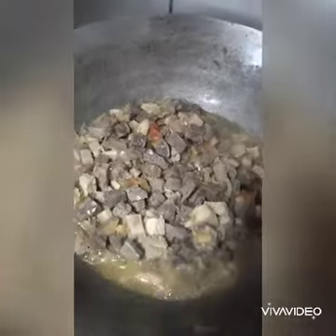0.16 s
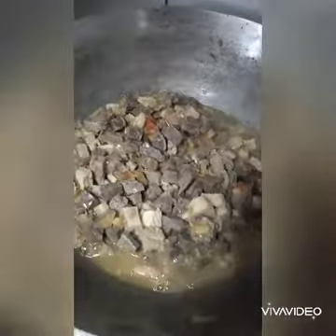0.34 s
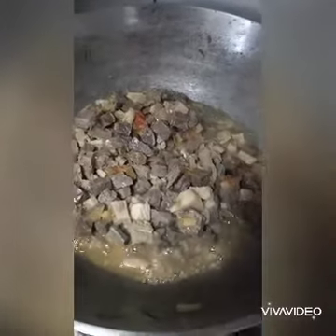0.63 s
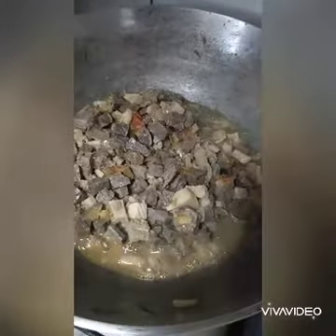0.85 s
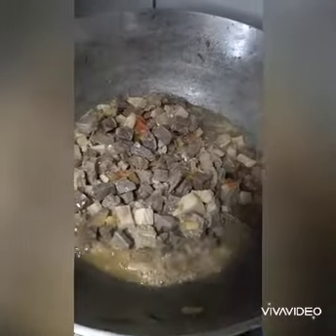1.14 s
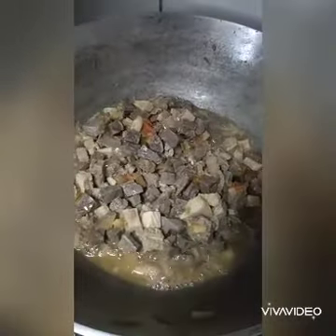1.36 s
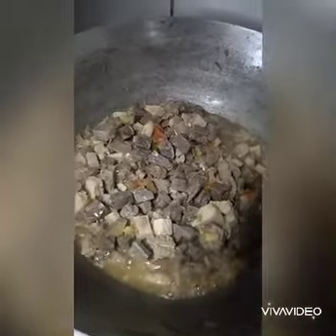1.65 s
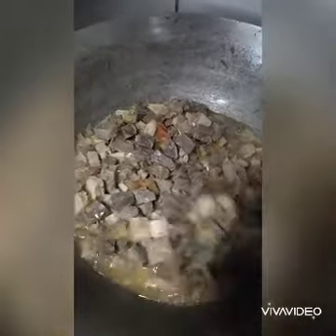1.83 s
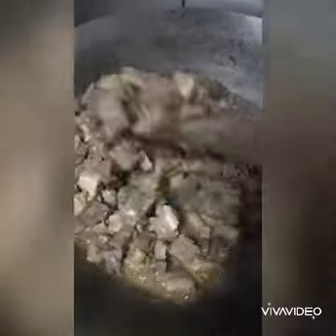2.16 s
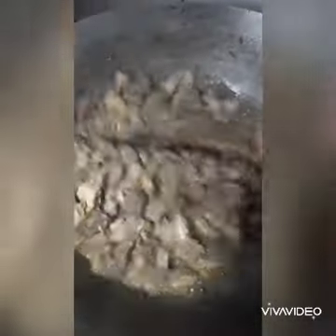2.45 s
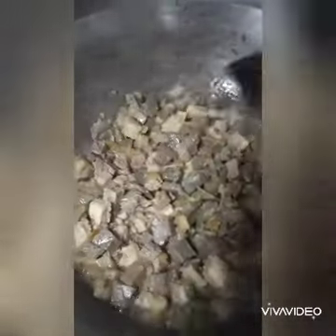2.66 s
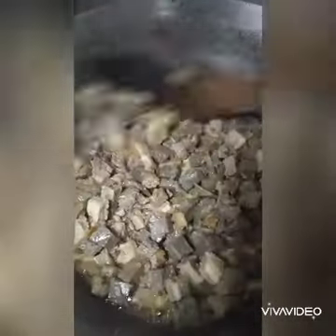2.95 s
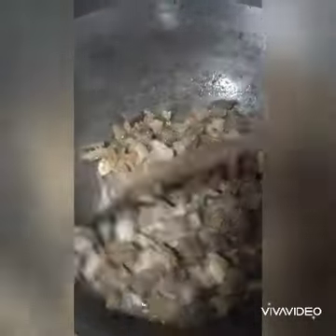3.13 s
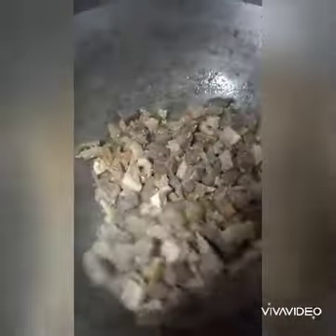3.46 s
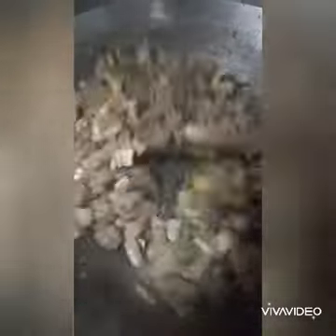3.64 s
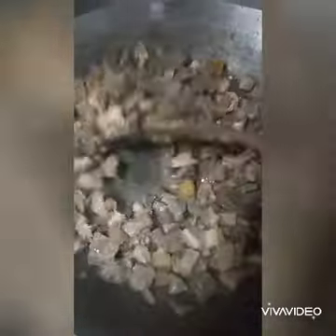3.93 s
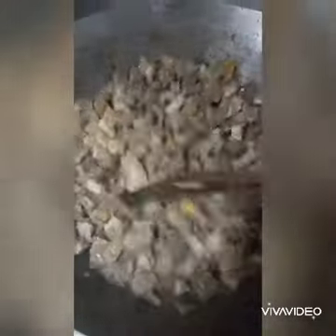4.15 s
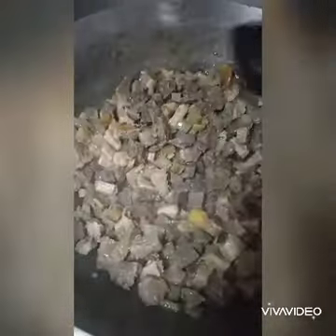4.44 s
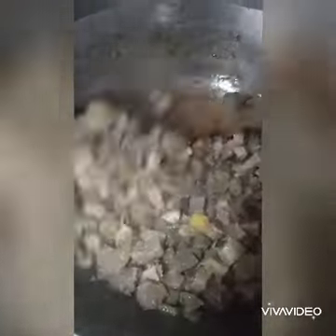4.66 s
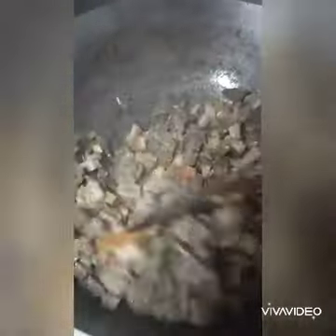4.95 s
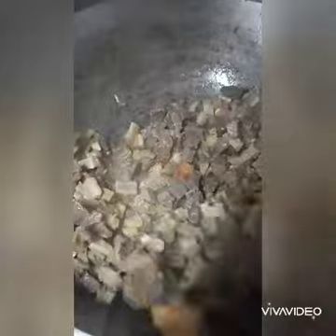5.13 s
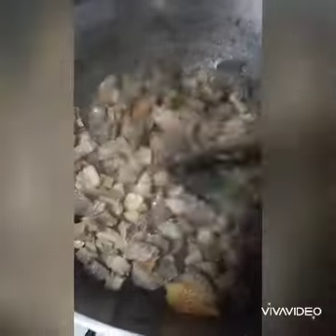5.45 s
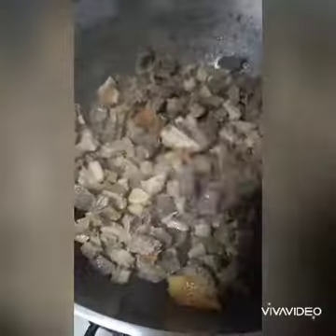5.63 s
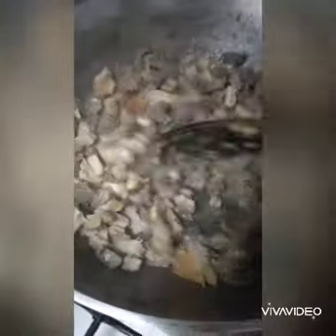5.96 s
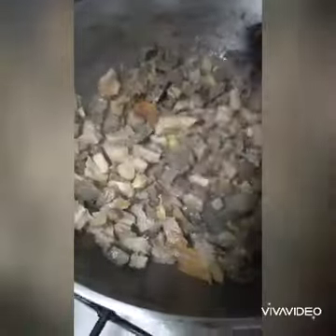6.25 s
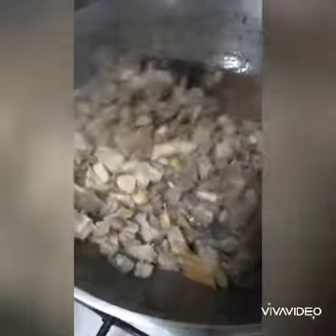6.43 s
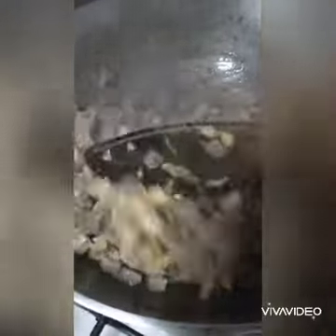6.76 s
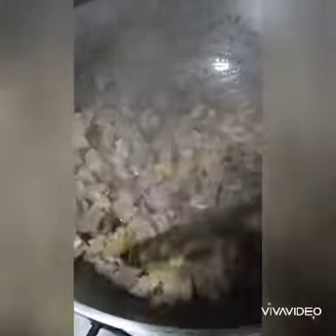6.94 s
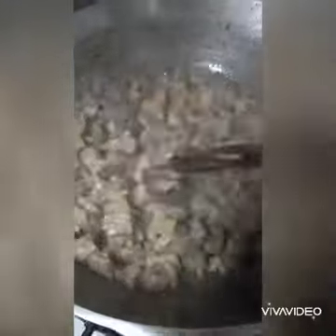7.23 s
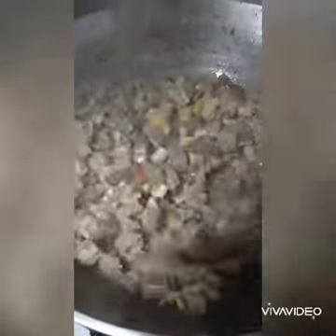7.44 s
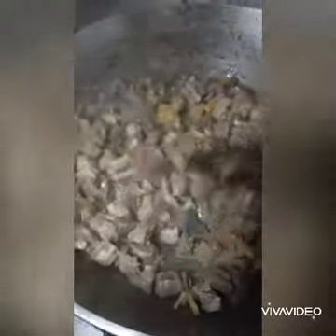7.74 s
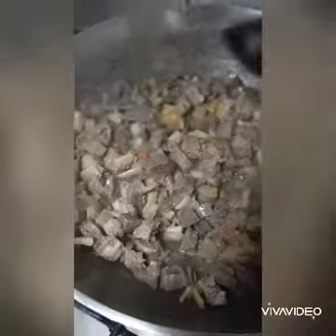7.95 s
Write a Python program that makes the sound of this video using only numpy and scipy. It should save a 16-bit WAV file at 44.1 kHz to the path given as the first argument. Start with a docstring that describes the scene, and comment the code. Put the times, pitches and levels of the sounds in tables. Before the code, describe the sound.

A close stereo phone pickup of a kitchen stove, leaning left: chopped meat fries in a steel wok with a steady, fine, crackling sizzle throughout. At 0 s a bowl is set down in a rapid hollow clatter lasting about a tenth of a second. Until about 1.8 s there is mainly sizzle, low sauce bubbling and soft bumps of the wok. From 2 s a spatula stirs in gritty, rushing scrapes with snapping bits, busiest to about 4.6 s, with dull ringing knocks on the wall near 2.7, 3.5 and 4.4 s and low thumps as the wok rocks. Bubbling fades after 3 s, returning briefly around 3.6 s. Separate strokes follow near 5.3 and 5.7 s, a knock at 6.1 s, a crisp crackly scrape at 7.0 s, softer strokes, then a firm metallic knock with a low thud at 7.8 s. Sizzling continues to the end at about 8 s.

```python
"""A kitchen stove: chopped meat simmers in a steel wok, close under a phone with two microphone ports.
Fat and sauce are two-port noise with short faint pips, and low thuds for bubbles; a spatula stirs with
gritty rushes of noise and snapping chips, and its shoves rock the wok so that resonances of stand
and hollow sound. Decaying modes with a dull crack make the knocks on the wall and, at the start,
a bowl that clatters down."""
import sys
import numpy as np
from scipy import signal
from scipy.fft import rfft, irfft, next_fast_len
from scipy.io import wavfile
from scipy.ndimage import uniform_filter1d

SR = 44100
rng = np.random.default_rng(int(sys.argv[2]) if len(sys.argv) > 2 else 0)


def store_wav(level_fs):
    """Save 16-bit WAV to argv[1]."""
    pcm = np.round(np.clip(np.atleast_2d(level_fs), -1, 1) * 32767)
    wavfile.write(sys.argv[1], SR, pcm.T.astype(np.int16))


N = 356769


def sizzle():
    """Countless steam bubbles burst in the fat, too dense to hear singly; the sauce bubbles lower and boils away."""
    # sizzling fat: (time [s], level [dB])
    fat_level = [(0.0, -48.5), (0.9, -48.5), (1.7, -48), (2.14, -48), (3.2, -48.5), (3.6, -47), (4.12, -48),
                 (4.73, -49), (5.18, -48.5), (6.76, -48.5), (8.09, -48.5)]
    # its colour at each port: (frequency [Hz], left [relative dB], right [relative dB])
    fat_colour = [(343.14, -6, -67), (520.1, -28.5, -26.5), (718.96, -35.5, -6), (815.62, -61.5, -23),
                  (1322.9, -13.5, -9), (2151.1, -7.5, -6), (2912.6, -17.5, -18.5), (5109.4, -16, -24.5),
                  (5760, -10.5, -11.5), (8624.1, -6, -11), (10166, -21, -26.5), (11548, -17, -22),
                  (13155, -23, -30), (14516, -30.5, -28.5)]
    # bubbling sauce: (time [s], level [dB])
    sauce_level = [(0.0, -49.5), (0.3, -54.5), (1.3, -55.5), (2.48, -53), (3.15, -60), (3.63, -55),
                   (4.19, -62.5), (4.64, -60.5), (5.95, -64), (6.4, -60.5), (7.21, -64), (8.09, -64.5)]
    # its colour at each port: (frequency [Hz], left [relative dB], right [relative dB])
    sauce_colour = [(498.5, -33, -57.5), (620.8, -26, 2), (746.5, -6, 7), (953.16, -1, -8),
                    (1003.8, 10.5, 9.5), (1275.8, -7.5, -4), (1541, -3, 7.5), (2485, -52, -59.5)]
    # low resonances of the boil: (frequency [Hz], width [Hz], level [relative dB])
    boil_modes = [(153.49, 64.7, -0.5), (237.36, 121.2, -2.5), (333.6, 62.57, -1)]
    fat = hiss(fat_colour, peaky=1, patchy_db=1.4, flicker_db=.35)
    sauce = hiss(sauce_colour, peaky=1, patchy_db=2.3, flicker_db=0.6954)
    thuds = rung(boil_modes, jolts(per_s=40., spread_db=2.894, wash=0.8937))  # large bubbles
    boil = gain_of(-11.5) * thuds * gain_of([[2.5], [-3.5]])
    fizz = fat + faint_pips()
    return gain_of(follow(fat_level)[0]) * fizz + gain_of(follow(sauce_level)[0]) * (sauce + boil)


def faint_pips():
    """Short faint tones, gliding up as they die, scattered over the fizz."""
    s, db, hz, pan_db = scattered(count=3000, hz=(896.45, 7931), spread_db=3.5)
    return pips(s, db - 16, hz, cycles=6.993, glide=0.14762, pan_db=pan_db)


def stir():
    """Steel drags over steel and wet food slumps: a patchy, gritty rush that swells and fades with each stroke."""
    # strokes of the spatula: (loudest moment [s], level [dB], time to fade by about 10 dB [s], sign ignored)
    strokes = [(.06, -55.5, 0.1533), (.59, -61.5, 0.4421), (1.62, -58, 0.2951), (1.98, -46, 0.192),
               (2.15, -52, 0.0259), (2.32, -47, 0.1985), (2.70, -52.5, 0.3384), (3.06, -53, 0.1957),
               (3.22, -53, -0.1313), (3.46, -50, 0.1593), (3.61, -49, 0.1235), (3.73, -51, 0.1874),
               (4.074, -52, 0.132), (4.412, -54.5, 0.2256), (4.472, -52, -0.0025), (4.535, -50.5, -0.033),
               (5.29, -49.5, 0.1709), (5.735, -50.5, 0.063), (6.155, -58, 0.2723), (7.03, -48.5, 0.0594),
               (7.24, -53, -0.0435), (7.29, -55, 0.0336), (7.47, -53.5, -0.1744), (7.87, -58, 0.205)]
    # colour of the rush at each port: (frequency [Hz], left [relative dB], right [relative dB])
    rush_colour = [(471.6, -18.5, -12.5), (758, -29, -1), (1015.7, -9, 1), (1712.3, 1, 1), (2263.7, 4, -2),
                   (3090.6, -1.5, 0), (3955.3, -23.5, -15), (5043, -7, -9.5), (6738.5, -5, -9.5),
                   (7872.5, 1, 0.5), (9410.5, -22.5, -20)]
    rise_share, blunt_top = 0.3594, 0.3235  # rise time as a share of the fade; rounding of each peak
    grit_per_s, grit_s, grit_share = 300., .003, .3
    t = coarse_time()
    strokes_db = []
    for peak_s, db, fade in strokes:
        fade_s = abs(fade)
        away = np.maximum((t - peak_s) / fade_s, (peak_s - t) / (rise_share * fade_s))
        strokes_db.append(db - 10 * (np.hypot(away, blunt_top) - blunt_top))
    settling_db = -60  # food settling between strokes
    level = np.interp(np.arange(N) / SR, t, summed(settling_db, strokes_db))
    chips = snaps(level)
    bumps = abs(jolts(grit_per_s, spread_db=2., wash=0))
    catches = signal.lfilter([1], [1, -np.exp(-1 / (grit_s * SR))], bumps)
    gritty = evened(1 - grit_share + grit_share * evened(catches))
    return chips + level * gritty * hiss(rush_colour, peaky=.35, patchy_db=1.3, flicker_db=.5)


def snaps(level):
    """Chips of food and crust snap under the blade: the loudest are listed, many more follow the stroke."""
    # loudest snaps: (time [s], level [dB], pitch [Hz])
    loudest = [(.740, -45, 1500), (1.988, -40, 2100), (2.128, -41, 1700), (2.300, -42, 2700),
               (2.352, -41, 1500), (3.698, -42, 1800), (3.721, -41, 2400), (5.726, -45, 2800),
               (5.954, -47, 1700), (7.012, -45, 2000), (7.029, -40, 2100), (7.041, -43, 2200),
               (7.055, -43, 1800), (7.075, -44, 1700), (7.246, -42, 2000)]
    cycles = 2.5  # each tone dies within a few cycles
    s, db, hz, pan_db = scattered(count=1200, hz=(1000., 3300.), spread_db=4.)
    small = level * pips(s, db - 5, hz, cycles, glide=0, pan_db=pan_db)
    s, db, hz = np.transpose(loudest)
    return small + pips(s, db, hz, cycles, glide=0, pan_db=np.full(len(s), 4.))


def rocking():
    """The stand thrums alike at both ports; the hollow note reaches mostly the left one."""
    # resonances of the stand: (frequency [Hz], width [Hz], level [relative dB])
    stand_modes = [(43.76, 21.79, -6.5), (85.813, 20.373, 1), (119.63, 32.8, -8), (167.7, 40.32, -6.5),
                   (245.81, 35.35, -15.5)]
    # resonances of the hollow wok: (frequency [Hz], width [Hz], level [relative dB])
    hollow_modes = [(294.15, 38.52, -2.5), (348.7, 32.46, 1), (430.15, 62.05, -9)]
    thrum = rung(stand_modes, jolts(per_s=90., spread_db=0.871, wash=1.4527))
    stand = steadied(thrum, 0.25) * gain_of([[1.8], [-2.6]])
    separate = np.array([rung(stand_modes, rng.standard_normal(N)) for _ in range(2)])
    stand += gain_of(-19.5) * separate  # a little that differs between the ports
    note = rung(hollow_modes, jolts(per_s=150., spread_db=0.678, wash=0.9135))
    hollow = steadied(note, 0.2126) * gain_of([[4.], [-8.]])
    stand *= shaken(column=2, fade_db_per_s=76, rest_db=-65.5)
    return stand + hollow * shaken(column=3, fade_db_per_s=98.5, rest_db=-100.5)


def shaken(column, fade_db_per_s, rest_db):
    """Each shove sets in quickly, holds, and dies away at a steady rate in dB."""
    # shoves that rock the wok: (start [s], time from start to fade [s], stand [dB], hollow note [dB])
    shoves = [(0., 0.323, -53, -52.5), (0.306, 0.24354, -59.5, -57.5), (0.703, 0.14415, -53, -54.5),
              (0.888, 0.1693, -62.5, -53), (1.251, 0.1918, -63.5, -68), (1.538, 0.09084, -65.5, -60),
              (1.811, 0.16595, -52.5, -52.5), (2.211, 0.2813, -60.5, -61.5), (2.704, 0.1155, -50.5, -58),
              (2.992, 0.0805, -49.5, -54), (3.408, 0.08, -55.5, -56), (3.483, 0.0617, -47, -57.5),
              (3.704, 0.0556, -55.5, -61.5), (3.81, 0.07303, -51, -55.5), (4.368, 0.2824, -55.5, -60),
              (4.847, 0.04194, -62, -65.5), (5.125, 0.1246, -63, -65.5), (5.295, 0.06516, -54.5, -54),
              (5.575, 0.3593, -65, -70), (6.141, 0.10855, -53, -54), (6.28, 0.0301, -47.5, -58),
              (6.569, 0.0243, -55.5, -67), (6.874, 0.3773, -59, -83), (7.423, 0.0318, -53.5, -65.5),
              (7.712, 0.0926, -56, -79), (7.84, 0.08585, -45.5, -58.5)]
    rise_s = 0.05159  # time to rise by 20 dB
    t = coarse_time()
    shoves_db = []
    for row in shoves:
        start, hold = row[:2]
        early = np.maximum(start + rise_s / 2 - t, 0)
        late = np.maximum(t - start - hold, 0)
        shoves_db.append(row[column] - 20 * early / rise_s - fade_db_per_s * late)
    return np.interp(np.arange(N) / SR, t, summed(rest_db, shoves_db))


def wok_knocks():
    """The spatula knocks the steel wall, whose modes ring on after a dull crack."""
    # (time [s], strength [dB], hardness [dB per octave], place from bottom -1 to rim 1,
    #  ring length [factor], crack [dB], left over right [dB])
    knocks = [(2.686, -32.5, -1.6556, -0.961, 0.8319, 1.5, 1.2825),
              (2.692, -41, -0.5, -0.334, 0.3824, 0.5, -8), (3.06, -53, 5.5, -0.691, 0.8606, -4.5, 7.5),
              (3.487, -32.5, -6, -0.357, 0.3185, -8.5, -2), (3.83, -44, -4, -0.642, 0.4425, -11, -4),
              (4.067, -70, 15.5, -0.079, 0.2477, -7, -1), (4.362, -33.5, -2, -0.6503, 0.736, -2.5, 3),
              (6.141, -36, -2.5, 0.9368, 0.8336, -5, 1), (6.148, -44.5, -4.5, -0.0052, 1, 2, -2),
              (7.405, -47.5, -6.5, -0.762, 0.34, -4, -7.5), (7.84, -40, 2, -0.0723, 0.699, -6.5, 9),
              (7.847, -31.5, -2.5, 0.0051, 0.9597, -5, 1)]
    # pitch of each mode of the wall: [Hz]
    wall_hz = [183, 253, 348, 420, 612, 657, 724, 805, 856, 1023, 1212, 1303, 1384, 1467, 2015, 2261, 2509,
               2950, 3450]
    # a row for each mode: (left [dB], right [dB], T60 [s], gain when struck near the rim [dB])
    wall_modes = [(-15.5, -32.5, 0.9647, 8.5), (-15, -26, 0.713, -4), (-7.5, -16.5, 0.2801, -6.5),
                  (-0.5, -13, 0.48134, 3), (-11.5, -19.5, 0.3746, 4), (-25, -9, 0.636, 4.5),
                  (-8.5, -3.5, 0.11803, -5), (-50, -4, 0.1663, -1), (-38, -28, 0.3137, 30.5),
                  (-13, -40.5, 0.6962, -7.5), (-4, -9.5, 0.3657, 7.5), (-34, -24.5, 0.48, 3),
                  (-23, -23, 0.1284, 18), (-9, -46, 0.508, 7), (-17, -12, 0.393, 13),
                  (-18, -41.5, 0.3243, -13), (-34.5, -12.5, 0.1837, -14), (-14, -24.5, 0.108, -6),
                  (-15, -19.5, 0.1401, 1)]
    return blows(knocks, wall_hz, wall_modes, crack_hz=1330., crack_t60=0.03864, twin_db=-13.)


def bowl_clatter():
    """A bowl is set down: a quick run of blows on its own modes."""
    # (time [s], strength [dB], hardness [dB per octave], place from bottom -1 to rim 1,
    #  ring length [factor], crack [dB], left over right [dB])
    touches = [(0., -28.5, -0.0875, 0.033, 0.749, -7, 1.5), (.017, -30, 0.8238, -0.033, 0.4874, -6.5, 4.5),
               (.026, -28.5, 0.6233, -0.32, 0.5457, -3, 2.7944), (.036, -36.5, -2, -0.155, 0.359, -3, -1.5),
               (.049, -25, 0.4237, 0.8517, 0.993, -11, -0.38),
               (.064, -46.5, -0.43, -0.494, 0.3965, 12.5, 7.5),
               (.085, -42, 1.5, -0.145, 0.9265, -15.5, -0.5)]
    # pitch of each mode of the bowl: [Hz]
    bowl_hz = [156, 296, 345, 447, 490, 590, 735, 861, 1071, 1416, 1680, 2110, 2560, 3100]
    # a row for each mode: (left [dB], right [dB], T60 [s], gain when struck near the rim [dB])
    bowl_modes = [(-21, -22.5, 1, -3.5), (-21.5, -24.5, 1, 6.5), (-19.5, -29, 0.2897, -12),
                  (-7, -16, 0.3532, 4), (4, -16, 0.04923, 0), (-6.5, -34, 0.328, -6),
                  (-8, -34, 0.4038, -6.5), (-26, -29.5, 0.2354, -6.5), (-10, -39.5, 0.536, -0.5),
                  (-1, -22.5, 0.1019, -9.5), (2.5, -12, 0.03281, 8.5), (-3, -27.5, 0.32965, 5),
                  (-5.5, -10, 0.085, 3), (-16, -22.5, 0.0943, 4.5)]
    return blows(touches, bowl_hz, bowl_modes, crack_hz=1814., crack_t60=0.05332, twin_db=-15.)


def blows(events, modes_hz, modes, crack_hz, crack_t60, twin_db):
    """Each blow rings the modes, unevenly by where it lands, over a short dull crack and its echo in the kitchen."""
    out, t = np.zeros((2, N + SR)), np.arange(SR // 2) / SR
    hz = np.array(modes_hz)[:, None]
    left_db, right_db, t60, rim_db = np.transpose(modes)[..., None]
    swell = 1 - np.exp(-t * hz / .6)  # bass swells slower
    # a round wall splits each mode into a close pair that beats, 12 Hz apart for a mode at 420 Hz
    split = 2 * np.pi * 12.115 * (hz / 420) ** 0.3127 * t
    near_turns = 2 * np.pi * hz * t
    far_turns = 2 * np.pi * hz * (t - 9e-5) + hz / 700  # the far port lags and turns in phase
    near, far = (swell * (np.sin(a) + gain_of(twin_db) * np.sin(a + split)) for a in (near_turns, far_turns))
    bright = signal.butter(2, [1500., 3612], "band", fs=SR, output="sos")
    for s, db, hard, place, ring, crack_db, pan in events:
        rings = gain_of(hard * np.log2(hz / 420) + place * rim_db - 60 * t / (t60 * ring))
        left = gain_of(left_db) * rings * near
        right = gain_of(right_db) * rings * far
        noise = rng.standard_normal((3, len(t)))  # one for each port and one in common
        dull = signal.butter(3, [220., crack_hz * 2 ** (hard / 6)], "band", fs=SR, output="sos")
        crack = evened(signal.sosfilt(dull, noise[:2] + 0.2423 * noise[2]))
        crack *= gain_of(-60 * t / crack_t60) + gain_of(-8 - 60 * t / 0.4259)  # direct, then the echo
        tick = evened(signal.sosfilt(bright, noise[:2] + noise[2]))
        crack += gain_of(-10 - 60 * t / 0.01867) * tick  # first bright contact
        punch = signal.sosfilt(dull, signal.sosfilt(dull, 1. * (t == 0)))  # the blow itself
        crack += gain_of(21.) * punch / np.linalg.norm(punch)
        ports = np.array([left.sum(0), right.sum(0)]) + gain_of(crack_db) * crack
        at = round(s * SR)
        out[:, at:at + len(t)] += gain_of(db + np.array([[pan / 2], [-pan / 2]])) * ports
    return out[:, :N]


def hiss(colour, peaky, patchy_db, flicker_db, size=1024):
    """Two-port noise from random short-time spectra, with narrow drifting patches and flicker shared by all bins."""
    # pitch of each resonance of port and wok that the hiss excites: [Hz]
    peak_hz = [655, 730, 790, 1390, 1695, 1890, 3745, 4430, 6520, 12000, 15330]
    # a row for each resonance: (width [Hz], left [dB], right [dB]), before the factor peaky
    peaks = [(47.98, 4, 5), (30.05, 6.5, -4), (36.56, 4.5, 7), (86.96, 11.5, -5.5), (91.14, 9.5, -0.5),
             (87.08, 9, -15.5), (228.1, 7, 6.5), (278.25, 8.5, 8), (344.7, 12, -2), (967, 2.5, 0.5),
             (399, 18.5, 6)]
    # likeness of the ports: (frequency [Hz], left-right likeness [0 to 1])
    likeness = [(400, 0.7895), (1200, 0.236), (2500, 0.0424), (5000, 0.0524), (15000, 0.0058)]
    frames, hz = 4 * N // size + 5, np.fft.rfftfreq(size, 1 / SR)
    a, b, c, d, patches = rng.standard_normal((frames, len(hz), 5)).T
    patches = uniform_filter1d(patches, size=3, axis=0)  # across bins
    patches = evened(uniform_filter1d(patches, size=12, axis=1))  # across frames
    flicker = uniform_filter1d(rng.standard_normal(frames), size=3)
    flicker = evened(flicker - uniform_filter1d(flicker, size=30))  # quick changes only
    same = np.clip(read(likeness, hz)[0], 0, 1)[:, None]
    left = a + 1j * b
    right = same * left + np.sqrt(1 - same ** 2) * (c + 1j * d)
    peaks_db = 0
    for f, (width, left_db, right_db) in zip(peak_hz, peaks):
        peaks_db = peaks_db + peaky * np.outer([left_db, right_db], np.exp(-((hz - f) / width) ** 2))
    below = np.minimum(hz / colour[0][0], 1) ** 4  # falls away under the first point
    shape = below * gain_of(read(colour, hz) + peaks_db)
    z = np.array([left, right]) * shape[..., None]
    z *= gain_of(patchy_db * patches + flicker_db * flicker)
    out = signal.istft(z, nperseg=size, noverlap=3 * size // 4)[1][:, :N]
    return out / np.sqrt(np.mean(out.mean(0) ** 2))


def rung(modes, drive):
    """A drive signal through a few resonances, each applied twice for steep flanks."""
    size = next_fast_len(N)
    hz = np.fft.rfftfreq(size, 1 / SR)
    shape = 0
    for k, (f, width, db) in enumerate(modes):
        shape = shape + (-1) ** k * gain_of(db) / (1 + 2j * (hz - f) / width) ** 2
    shape = shape * np.minimum(hz / modes[0][0], 1)  # less under the lowest
    return evened(irfft(rfft(drive, size) * shape, size)[:N])


def jolts(per_s, spread_db, wash):
    """Small irregular bumps over a steady push of noise."""
    size = gain_of(spread_db * np.minimum(rng.exponential(1, N), 4)) * rng.choice([-1., 1.], N)
    bumps = evened(size * (rng.random(N) < per_s / SR))
    return bumps + wash * rng.standard_normal(N)


def scattered(count, hz, spread_db):
    """Random moments, levels (a few large), pitches and sides, leaning left."""
    when, size, pitch, side = rng.random((count, 4)).T
    db = -spread_db * np.log(size + 0.01463)
    return when * (N - 1) / SR, db, hz[0] * (hz[1] / hz[0]) ** pitch, 5 + 16 * (side - .5)


def pips(s, db, hz, cycles, glide, pan_db):
    """Short dying tones at given moments, gliding up if asked, each with its own balance of the ports."""
    t = np.arange(330) / SR
    turns = hz[:, None] * t
    wave = np.sin(2 * np.pi * turns * (1 + glide * turns / cycles))
    tone = gain_of(db)[:, None] * np.exp(-turns / cycles) * wave
    at = (np.round(s * SR).astype(int)[:, None] + np.arange(len(t))).ravel()
    ports = []
    for side, lag in ((1, 0), (-1.47, 4)):  # the right port hears each pip 4 samples later
        panned = tone * gain_of(side * pan_db / 2)[:, None]
        ports.append(np.bincount(at + lag, panned.ravel(), N + SR)[:N])
    return np.array(ports)


def steadied(x, s):
    """Evens out swells slower than about s seconds, so that the push mainly sets the level."""
    return evened(x / np.sqrt(uniform_filter1d(x ** 2, round(s * SR)) + 0.0292))


def summed(rest_db, events_db):
    """Gain of overlapping events over a resting level; their powers add."""
    return np.sqrt(gain_of(2 * rest_db) + sum(gain_of(2 * db) for db in events_db))


def coarse_time():
    """Times 2 ms apart for slow level curves."""
    return np.arange(0, N / SR + .002, .002)


def gain_of(db):
    """Decibels to amplitude."""
    return 10 ** (np.asarray(db) / 20)


def evened(x):
    """Scales to rms 1."""
    return x / np.sqrt(np.mean(x ** 2) + 1e-20)


def read(points, hz):
    """Each column of a spectrum, joined on a log-frequency axis."""
    f, *values = np.transpose(points)
    return np.array([np.interp(np.log(hz + 1), np.log(f + 1), v) for v in values])


def follow(rows):
    """Each column of a curve, sample by sample."""
    s, *values = np.transpose(rows)
    return [np.interp(np.arange(N) / SR, s, v) for v in values]


def scene():
    """All sources at the two ports."""
    return sizzle() + stir() + rocking() + wok_knocks() + bowl_clatter()


def record(dry):
    """A suppressor turns down bins that fall below their own median or a fixed faint level; then the band limit."""
    z = signal.stft(dry, nperseg=1024, noverlap=768)[2]
    power_db = 10 * np.log10(uniform_filter1d(abs(z) ** 2, size=5, axis=2) + 1e-20)
    threshold_db = np.maximum(np.median(power_db, axis=2, keepdims=True), -84.)
    z *= gain_of(-np.clip(2.4273 * (threshold_db - power_db), 0, 12.))  # by 12 dB at most
    cleaned = signal.istft(z, nperseg=1024, noverlap=768)[1][:, :N]
    edge_hz = 15560
    low_pass = signal.firwin(1023, edge_hz, window=("kaiser", 9), fs=SR)
    return signal.oaconvolve(cleaned, low_pass[None], "same")


dry = scene()
out = record(dry)
store_wav(out)
```